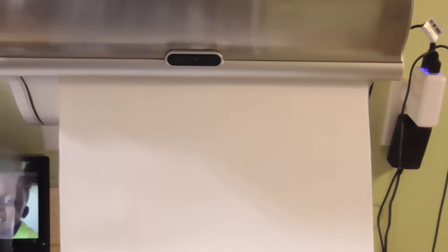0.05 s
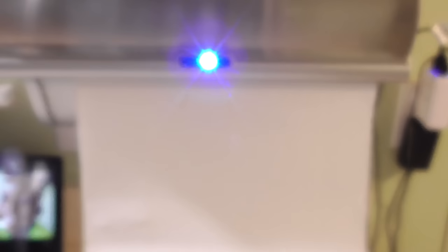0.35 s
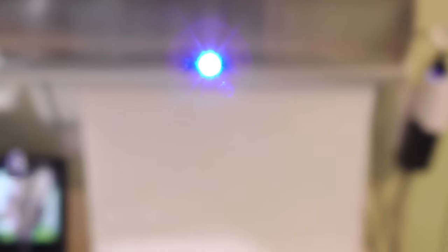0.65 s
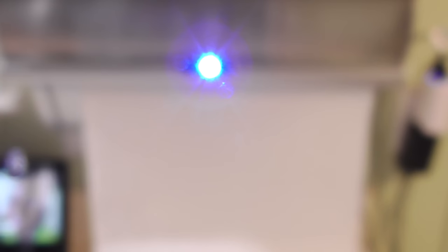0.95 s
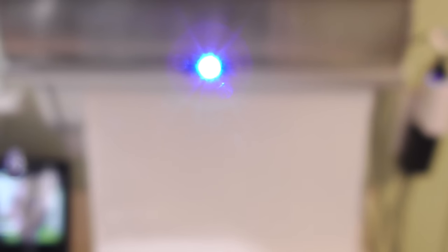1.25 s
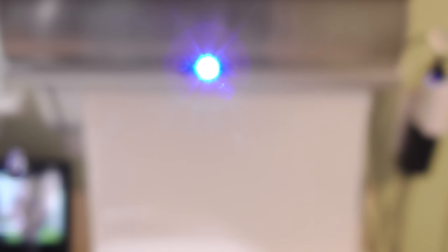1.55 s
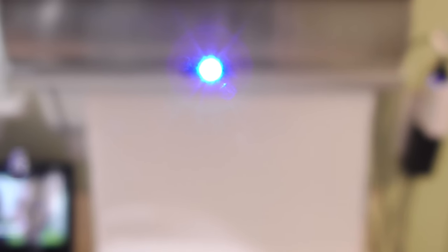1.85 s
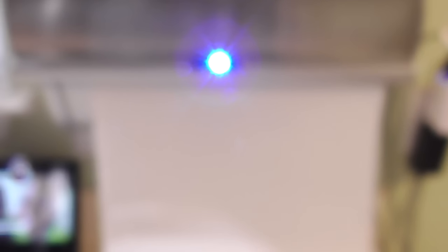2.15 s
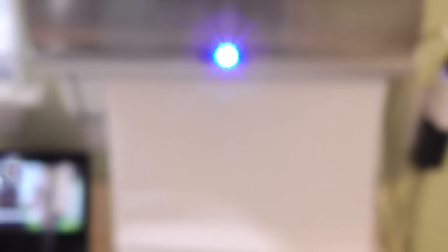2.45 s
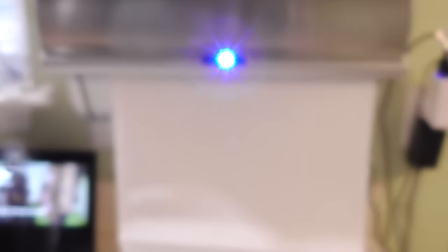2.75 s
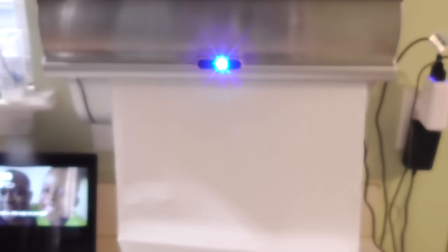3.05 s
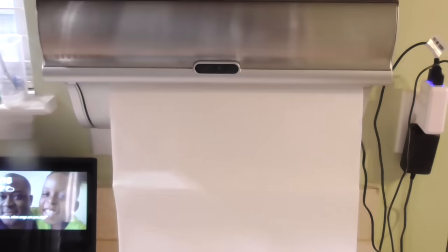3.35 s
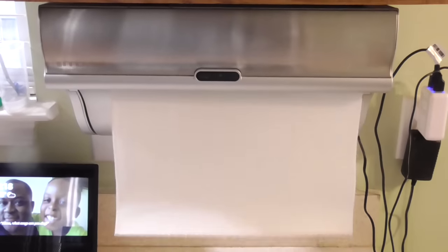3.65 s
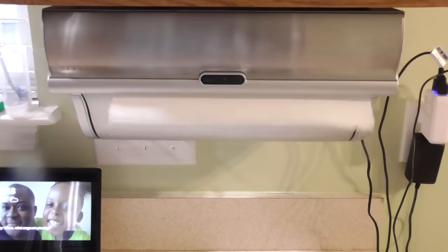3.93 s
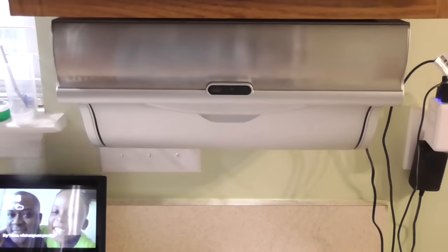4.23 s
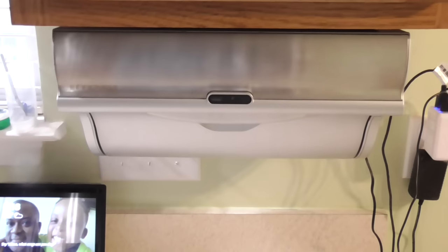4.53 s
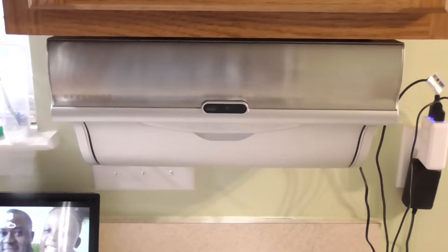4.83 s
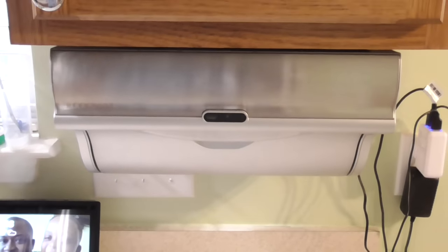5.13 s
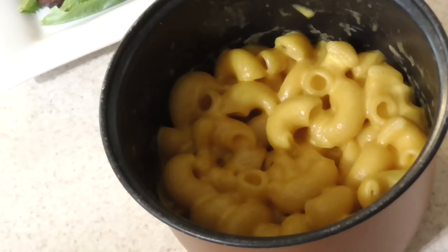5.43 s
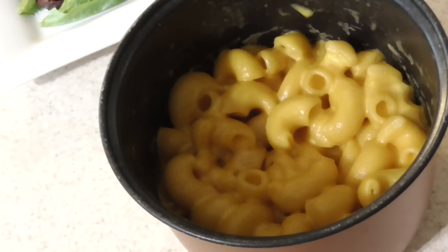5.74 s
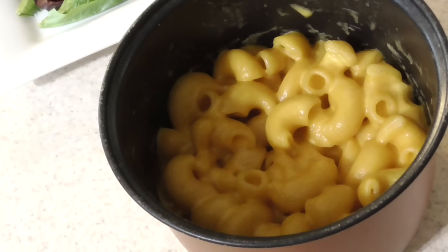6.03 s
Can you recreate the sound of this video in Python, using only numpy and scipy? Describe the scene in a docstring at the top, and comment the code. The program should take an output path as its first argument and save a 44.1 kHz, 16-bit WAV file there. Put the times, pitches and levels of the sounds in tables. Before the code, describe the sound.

A motorised paper towel dispenser whirs briefly twice, followed by rustling paper and sharp plastic clicks over a faint refrigerator hum.

```python
"""A motorised paper towel dispenser, close by in a kitchen where a refrigerator hums throughout.
One feed ends at 0.24 s; a few light clicks follow, and from 0.5 s a camera's focus drive ticks faintly.
At 3.3 s the motor spins up for a second feed: plastic gears rattle, the cover drones, paper hisses.
The sheet snags with a thud near 4 s; at 4.3 s the motor cuts out and coasts, and the cover shudders.
Then paper rustles, and plastic clicks go on until about 5.4 s, leaving the focus drive and the hum."""
import sys
import numpy as np
from scipy import signal
from scipy.fft import rfft, irfft
from scipy.io import wavfile
from scipy.ndimage import uniform_filter1d

SR = 44100
rng = np.random.default_rng(int(sys.argv[2]) if len(sys.argv) > 2 else 0)


def master(y):
    """Save y as 16-bit WAV."""
    cut = np.clip(np.atleast_2d(y).T, -1, 1)
    pcm = np.round(cut * 32767)  # scale
    wavfile.write(sys.argv[1], SR, pcm.astype(np.int16))


N = 268348
TIME, FREQS = np.arange(N) / SR, np.fft.rfftfreq(N, 1 / SR)


# motor cues: (switch on [s], switch off [s], coasting time constant [s])
MOTOR_RUNS = [(-0.7, 0.24, 0.041), (3.328, 4.274, 0.066)]
# EQ of the gear rattle in each feed: (frequency [Hz], relative gain [dB])
FIRST_RATTLE_EQ = [(50, -36), (250, -13), (400, -13), (440, -11), (490, -4.5), (630, -2), (720, 4),
                   (830, -5), (940, -4), (1090, -9.5), (1620, -13), (2600, -27), (4400, -36), (7000, -49)]
SECOND_RATTLE_EQ = [(50, -36), (460, -12), (560, 0), (780, -0.5), (870, -5), (1000, 2), (1180, -6),
                    (1400, -12), (1820, -17), (2020, -10), (2400, -22), (3200, -25.5), (4300, -34.5),
                    (7000, -43.5)]
# tones the motor draws from the housing in each feed: (frequency [Hz], relative level [dB])
FIRST_WHINE = [(254, -6.5), (318.8, -3.5), (391, -12), (732, -9), (932, -14)]
SECOND_WHINE = [(220.2, -8.5), (254.5, -17.5), (318, -14), (636, -15.5), (712, -14.5), (790, -16),
                (817, -18), (1005, -17), (1065, -19), (1118, -19)]

def dispenser():
    """Two feeds of paper; the second is raspier and rings the housing harder."""
    first = feed(MOTOR_RUNS[0], FIRST_RATTLE_EQ, FIRST_WHINE, cover_db=-32.3, paper_db=-51.5,
                 ring_depth=0.44, rattle_db=-30.5, whine_db=-31.2, rasp_db=-44)
    second = feed(MOTOR_RUNS[1], SECOND_RATTLE_EQ, SECOND_WHINE, cover_db=-32.9, paper_db=-50.6,
                  ring_depth=1.08, rattle_db=-31.5, whine_db=-31.5, rasp_db=-39.2)
    return pan(-.3) * first + pan(0.1) * second


def feed(run, rattle_eq, tones, cover_db, paper_db, **gear_mix):
    """One run of the motor: gears, cover and paper all swell and fade with its speed."""
    on_s, off_s, coast_s = run
    speed_db = motor_speed_db(on_s, off_s, coast_s)
    gears = gear_train(speed_db, rattle_eq, tones, **gear_mix)
    return gears + amp(cover_db) * cover_drone(speed_db, off_s) + amp(paper_db) * roller_hiss(speed_db)


def motor_speed_db(on_s, off_s, coast_s, jerk=0.08, spin_up_s=0.14, snag_s=4.04):
    """Speed against full speed: the motor jerks on, creeps up, sags at the snag, and coasts."""
    spin_up = (TIME > on_s) * (1 - (1 - jerk) * np.exp(-np.maximum(TIME - on_s, 0) / spin_up_s))
    coast = np.exp(-np.maximum(TIME - off_s, 0) / coast_s)
    snag_db = -3 * np.exp(-((TIME - snag_s) / 0.05) ** 2)
    return 20 * np.log10(spin_up * coast + 1e-9) + snag_db


# housing peaks and notches: (frequency [Hz], width [Hz], gain at ring_depth 1 [dB])
HOUSING_MODES = [(627, 17, -0.5), (705, 12, 3), (807, 22, 6.5), (1072, 23, 3), (1174, 14, 2.5),
                 (1250, 25, 6), (1400, 31, 7), (1533, 33, 8.5), (1580, 44, -1), (1665, 30, 10),
                 (1947, 41, 9), (1970, 19, 1), (2035, 50, 9), (2130, 32, 3), (2680, 58, 4), (3200, 120, 6),
                 (4060, 120, 7.5)]

def gear_train(speed_db, rattle_eq, tones, ring_depth, rattle_db, whine_db, rasp_db, shaft_hz=21.88):
    """Gears and motor ring the housing: a dull rattle, a whine, and a bright rasp when driven hard."""
    drive_db = 0.66 * speed_db
    # the shaft wobbles, and turns slower while it spins up and coasts down
    turns = np.cumsum(shaft_hz * (1 + .008 * np.maximum(drive_db, -20) + .012 * drift(12))) / SR
    teeth = near_pair(gear_teeth(turns), gear_teeth(turns))
    housing = 1 + sum((amp(ring_depth * db) - 1) * bell(hz, width) ** 2
                      for hz, width, db in HOUSING_MODES)
    rattle = colour(teeth, amp(read(rattle_eq)) * housing * near_sides())
    dull = low_band(rattle, 1780, order=10)
    whine = wavering(tones, flutter=0.37, stray=0.58, rate_hz=10)
    body = (unit(dull) * amp(rattle_db) + whine * amp(whine_db)) * amp(drive_db)
    # most of the rasp needs full speed; the rest follows the dull rattle
    rasp_envelope = 0.76 * amp(1.8 * speed_db) + 0.24 * amp(drive_db)
    return body + unit(rattle - dull) * amp(rasp_db) * rasp_envelope


def gear_teeth(turns, count=16, uneven=0.86, rough=1.32, scrape=1.85, throb=0.061):
    """Loose teeth knock either flank, partly in a pattern that repeats each turn, and scrape between."""
    tooth = np.floor(turns * count).astype(int)
    strikes = np.diff(tooth, prepend=tooth[0]) > 0
    wear = unit(rng.standard_normal(count))
    force = 0.23 + uneven * wear[tooth % count] + rough * rng.standard_normal(N)
    contact = unit(strikes * force) + scrape * rng.standard_normal(N)
    return contact * (1 + throb * np.cos(2 * np.pi * turns))


# low modes of the cover: (frequency [Hz], width [Hz], relative level [dB])
COVER_MODES = [(180.5, 49, -6.5), (221.5, 11, 1.5), (251.6, 19, -6.5), (317.5, 14.8, 0.5), (340, 41, -1.5),
               (381, 16, -13.5)]

def cover_drone(speed_db, off_s, shudder_delay_s=0.034, shudder_s=0.022):
    """The motor shakes the cover into a low drone, which shudders just after the cut-out."""
    shake = near_pair(*rng.standard_normal((2, N)))
    modes = sum(amp(db) * bell(hz, width) ** 2 for hz, width, db in COVER_MODES)
    drone = colour(shake, modes * bell(322, 660) ** 4)
    # the steady motor keeps the cover swinging evenly
    power = uniform_filter1d((drone ** 2).mean(0), size=2000)
    drone = unit(drone / np.sqrt(power + .05))
    shudder_db = 7.5 * np.exp(-((TIME - off_s - shudder_delay_s) / shudder_s) ** 2)
    return drone * amp(0.88 * speed_db + shudder_db)


# EQ of paper on the rollers: (frequency [Hz], relative gain [dB])
ROLLER_EQ = [(2650, -26), (4500, 3), (4760, -4.5), (5920, -6), (7430, -1.5), (11000, -4), (14200, -16.5),
             (15500, -50)]

def roller_hiss(speed_db):
    """Paper runs over the rollers with a grainy hiss that rides the motor's speed."""
    fibres = near_pair(grains(9000, 1.6), grains(9000, 2.5))
    return colour(fibres, amp(read(ROLLER_EQ)) * near_sides()) * amp(0.76 * speed_db)


# bumps of the roll and soft thuds: (time [s], level before the low cut [dB], pitch [Hz])
BUMP_HITS = [(.002, -19, 103), (.004, -15, 293), (.015, -15, 250), (3.385, -31, 215), (4.055, -10.5, 246),
             (4.058, -16, 350), (4.08, -17, 310), (4.422, -28.5, 300), (4.875, -35, 128), (4.966, -33, 160),
             (5.359, -38, 260)]

def roll_bumps(attack_s=0.0013, t60_cycles=18, low_cut_hz=120):
    """The roll jolts the cover: short low rings from a panel too small to radiate deep bass."""
    out, t = np.zeros((2, N)), np.arange(SR // 4) / SR
    for s, db, hz in BUMP_HITS:
        envelope = amp(db - 60 * t * hz / t60_cycles) * (1 - np.exp(-t / attack_s))
        add(out, s, envelope * np.sin(2 * np.pi * hz * t))
    return signal.sosfilt(signal.butter(3, low_cut_hz, "high", fs=SR, output="sos"), out)


# clicks: (time [s], knock level [dB], knock pitch [Hz], crack level [dB], crack ring [Hz], pan [dB])
CLICK_HITS = [(.343, -40, 1500, -49, 4000, -2), (0.582, -45, 1500, -57, 2370, -4),
              (0.752, -45, 1480, -53, 3950, -5), (4.566, -41, 1430, -30, 2190, -2),
              (4.703, -24, 1100, -43, 7000, -5), (4.757, -31, 890, -50, 5500, -4),
              (4.844, -26, 766, -44.5, 5960, -4), (4.876, -27, 800, -33, 8200, -4),
              (4.917, -28, 762, -44, 3500, -5), (4.9433, -7, 960, -28, 8200, -4.5),
              (4.949, -18, 935, -38, 8200, -12), (4.9665, -12, 800, -22, 8200, -0.5),
              (5.054, -29, 850, -42, 2600, -4), (5.192, -23, 1020, -41, 3960, -6),
              (5.3592, -17.5, 1050, -23.7, 8000, -5), (5.38, -44, 1080, -48, 8000, -4)]
# EQ of the crack: (frequency [Hz], relative gain [dB])
CRACK_EQ = [(300, -20), (900, 12), (1700, -5.5), (2400, 4), (4000, -1), (5500, -4), (8000, -3.5),
            (11000, -3.5), (15500, -13)]

def sharp_clicks(knock_t60_s=0.011, crack_t60_s=0.023, attack_s=0.0008, ring_width_hz=1200):
    """Each click layers a bright, resonant crack over a quickly damped knock; most are the dispenser's plastic,
    but the light clicks at 0.58 s and 0.75 s come from the lens."""
    out, t = np.zeros((2, N)), np.arange(SR // 10) / SR
    noise = pair(*rng.standard_normal((2, N)), likeness=[(500, 0.3), (4000, 0.34), (12000, 0.19)])
    noise = colour(noise, amp(read(CRACK_EQ)))
    for s, knock_db, hz, crack_db, ring_hz, pan_db in CLICK_HITS:
        phase = 2 * np.pi * hz * t
        body = np.sin(phase) + amp(-10) * np.sin(1.274 * phase) + amp(-12) * np.sin(0.6 * phase)
        knock = body * amp(knock_db - 60 * t / knock_t60_s) * (1 - np.exp(-t / attack_s))
        burst = noise[:, round(s * SR):][:, :len(t)]
        ring = amp(5) * signal.lfilter(*signal.iirpeak(ring_hz, ring_hz / ring_width_hz, SR), burst)
        fade = amp(crack_db - 60 * t / crack_t60_s)
        crack = unit((burst + ring) * fade) * np.sqrt(np.mean(fade ** 2))
        add(out, s, pan(pan_db) * (knock + crack))
    return out


# paper rustles; the last row is a short, faint hiss swelling into the click at 5.19 s and fading after:
# (peak time [s], attack [s], release [s], level [dB], low shelf [dB])
SWELLS = [(3.407, .015, .04, -48, -4), (3.855, .02, .03, -50, -4), (4.025, .015, .02, -41, -6),
          (4.16, .022, 0.026, -35, -6), (4.375, .012, .02, -55, 3), (4.493, 0.011, 0.1, -40, -7),
          (4.595, 0.04, 0.06, -48.5, 0), (4.71, 0.02, 0.05, -53, 6), (4.8, .04, 0.05, -51.5, 5),
          (4.935, 0.043, 0.027, -38.5, -1), (4.985, .02, 0.08, -53, 3), (5.102, 0.015, .05, -50.5, 0),
          (5.19, 0.015, 0.034, -48.5, 1)]
# their EQ: (frequency [Hz], relative gain [dB])
SWELL_EQ = [(300, -20), (600, -2), (1000, 9), (1800, -4), (2400, -3), (2900, -8), (4000, -1.5), (5900, -8),
            (7700, 0), (11000, -5), (15500, -13)]

def rustles_and_hiss(grains_per_s=4000, tail_db=-23, tail_s=0.13):
    """Grainy swells with soft tails: paper fibres catch, let go and settle; the last is a faint hiss."""
    snaps = pair(grains(grains_per_s, 2.6), grains(grains_per_s, 3.2), [(1500, 0.53), (10000, 0.25)])
    sides = pan_by_band([(1000, -4), (6000, -1), (13000, -10)])
    texture = colour(snaps, amp(read(SWELL_EQ)) * sides)
    lows = low_band(texture, 3200, order=3)  # in paper, the whole sheet rather than single fibres
    out = np.zeros((2, N))
    for s, attack, release, db, shelf_db in SWELLS:
        swell = np.interp(TIME - s, [-attack, 0, release], [0, 1, 0])
        tail = amp(tail_db) * (TIME > s) * np.exp(-abs(TIME - s) / tail_s)
        out += amp(db) * np.maximum(swell, tail) * (texture + (amp(shelf_db) - 1) * lows)
    return out


# kitchen reverb: (frequency [Hz], time to fall 60 dB [s])
REVERB_DECAY = [(150, 0.3), (1000, 0.27), (4000, 0.19), (14000, 0.032)]

def kitchen_reverb(x, reflections_per_s=3000):
    """Sparse reflections of random sign, each band dying at its own speed."""
    taps = rng.standard_normal((2, SR // 2)) * (rng.random((2, SR // 2)) < reflections_per_s / SR)
    taps[:, :SR // 250] = 0  # 4 ms pre-delay
    hz, t, bands = signal.stft(taps + .5 * taps[::-1], SR, nperseg=256)
    decay = amp(-60 * t / read(REVERB_DECAY, hz)[:, None])
    tail = signal.istft(bands * decay, SR, nperseg=256)[1]
    return signal.fftconvolve(x, tail / np.linalg.norm(tail[0]), axes=1)[:, :N]


# focus drive cues: (start [s], end [s], low ring level [dB], high ring level [dB])
FOCUS_CUES = [(.5626, .69, -65.5, -76), (.8294, 2.19, -66.3, -81), (2.1972, 2.9, -66.5, -73),
              (2.9145, 3.4, -69, -80), (5.229, 5.48, -69.5, -75), (5.4959, 6.05, -66.3, -69)]
# resonances the drive rings: (frequency [Hz], width [Hz], relative level [dB])
FOCUS_LOW_MODES = [(1440, 200, 2), (1530, 90, 2.5), (2250, 550, -2.5), (2626, 280, -5.5)]
FOCUS_HIGH_MODES = [(3780, 800, -1), (4670, 700, -10.5), (8740, 700, -5.5), (9800, 760, -9),
                    (11500, 1100, -12.5), (13900, 800, -14)]

def focus_drive(steps_per_s=59.95, pull=-.65, uneven=0.18):
    """The lens steps, pushing and pulling in turn, and each tick rings a few resonances."""
    ticks = np.zeros((2, N))  # one row for the low modes, one for the high
    for start, end, low_db, high_db in FOCUS_CUES:
        steps = np.flatnonzero(np.diff(np.floor((TIME - start) * steps_per_s)))
        steps = steps[(TIME[steps + 1] >= start) & (TIME[steps] < end)]
        ticks[:, steps] = amp([[low_db], [high_db]]) * np.resize([1, pull], len(steps))
    ticks *= np.sqrt(SR / steps_per_s) * (1 + uneven * rng.standard_normal(N))
    rings = [unit(sum(amp(db) * bell(hz, width) ** 4 for hz, width, db in modes))
             for modes in (FOCUS_LOW_MODES, FOCUS_HIGH_MODES)]
    return irfft((rfft(ticks) * rings).sum(0), N)


def lens_glide(start_s=0.5, end_s=0.76, level_db=-66):
    """The lens glides out of focus with a thin hiss."""
    gate = (TIME > start_s) & (TIME < end_s)
    return amp(level_db) * gate * colour(rng.standard_normal((2, N)), bell(11500, 6000) ** 2)


# EQ of the kitchen air: (frequency [Hz], relative gain [dB])
AIR_EQ = [(20, -38), (50, -15), (75, -13.5), (115, -7), (165, -8), (260, -3), (380, -9), (520, -10.3),
          (950, -15), (1400, -25), (1800, -31), (3200, -36), (6200, -41), (15800, -39)]
# its stereo image: (frequency [Hz], left-right likeness [0-1])
AIR_LIKENESS = [(60, 0.73), (180, 0.61), (550, 0.27), (1650, 0.54), (4970, 0.42), (15000, 0.042)]
# refrigerator tones: (frequency [Hz], level before trim [dB])
FRIDGE_TONES = [(98.6, -62.5), (117.6, -58.5), (134.7, -61.5), (200.3, -64.5), (235.3, -54.5), (269.2, -64),
                (525.6, -72.5), (936, -73)]

def room_tone(air_db=-53.2, hiss_db=-68, fridge_trim_db=-2):
    """The bed: still air, microphone hiss and the wavering hum of the refrigerator."""
    air = colour(pair(*rng.standard_normal((2, N)), AIR_LIKENESS), amp(read(AIR_EQ)))
    hiss = colour(rng.standard_normal((2, N)), bell(7730, 930) ** 2 + 0.99 * bell(10800, 8800) ** 2)
    hum = wavering(FRIDGE_TONES, flutter=0.18, stray=.35, rate_hz=3)
    return pan(0.27) * (amp(air_db) * air + amp(fridge_trim_db) * hum) + amp(hiss_db) * hiss


# stereo image of the dispenser: (frequency [Hz], left-right likeness [0-1])
DISPENSER_LIKENESS = [(60, 0.78), (180, 0.97), (550, 0.88), (1650, 0.89), (4970, 0.73), (15000, 0.33)]

def near_pair(a, b):
    """Gives two unrelated sounds the dispenser's stereo width."""
    return pair(a, b, DISPENSER_LIKENESS)


# placement of the dispenser: (frequency [Hz], left over right [dB])
DISPENSER_PAN = [(60, 0.5), (180, 10), (550, -2), (1650, -1.5), (4970, 0), (15000, -6)]

def near_sides():
    """The dispenser's left and right gains at each frequency."""
    return pan_by_band(DISPENSER_PAN)


def pair(a, b, likeness):
    """Mid-side stereo from two unrelated sounds, alike by band: (frequency [Hz], likeness [0-1])."""
    same = np.clip(read(likeness), 0, 1)
    mid, side = rfft(a) * np.sqrt(1 + same), rfft(b) * np.sqrt(1 - same)
    return irfft(np.array([mid + side, mid - side]), N)


def pan(left_over_right_db):
    return amp([[left_over_right_db / 2], [-left_over_right_db / 2]])


def pan_by_band(points):
    """Channel gains from (frequency [Hz], left over right [dB])."""
    return amp(np.array([[.5], [-.5]]) * read(points))


def wavering(tones, flutter, stray, rate_hz):
    """Tones (frequency [Hz], rms level [dB]) that flutter in level and stray in phase."""
    out = np.zeros(N)
    for hz, db in tones:
        level = amp(db) * (1 + flutter * drift(rate_hz))
        out += level * np.sin(2 * np.pi * hz * TIME + stray * drift(rate_hz))
    return np.sqrt(2) * out


def grains(per_s, spread_db):
    """Random tiny snaps of very uneven size; rms 1."""
    size = amp(spread_db * np.minimum(rng.exponential(1, N), 4)) * rng.standard_normal(N)
    return unit(size * (rng.random(N) < per_s / SR))


def drift(hz):
    """Slow random modulation up to about hz; rms 1."""
    knots = rng.standard_normal(400)
    return unit(np.interp(TIME * hz * 2, np.arange(len(knots)), knots))


def bell(hz, width_hz):
    """Magnitude of one resonance."""
    return 1 / np.sqrt(1 + (2 * (FREQS - hz) / width_hz) ** 2)


def read(points, hz=FREQS):
    """Joins (frequency [Hz], value) points on a log-frequency axis."""
    point_hz, value = np.transpose(points)
    return np.interp(np.log(hz + 1), np.log(point_hz + 1), value)


def colour(x, gain):
    """Filters by a gain for each frequency; rms 1."""
    return unit(irfft(rfft(x) * gain, N))


def low_band(x, hz, order):
    """Zero-phase low-pass: subtracting it from x leaves a clean high band."""
    return signal.sosfiltfilt(signal.butter(order, hz, fs=SR, output="sos"), x)


def amp(db):
    return 10 ** (np.asarray(db) / 20)


def unit(x):
    """Scales to rms 1."""
    return x / np.sqrt(np.mean(x ** 2) + 1e-20)


def add(mix, start_s, sound):
    part = mix[:, max(round(start_s * SR), 0):][:, :sound.shape[-1]]
    part += sound[..., :part.shape[1]]


def scene():
    """Dispenser and paper up front; only the dull part of each hit comes back from the kitchen."""
    feeds = dispenser()
    hits = roll_bumps() + sharp_clicks()
    send = signal.sosfilt(signal.butter(2, 1500, fs=SR, output="sos"), hits)
    reverb = amp(-17) * kitchen_reverb(send)
    return feeds + hits + reverb + rustles_and_hiss() + room_tone() + focus_drive() + lens_glide()


def record(dry):
    """A steep high cut at 15.85 kHz on the whole mix."""
    high_cut = signal.firwin(401, 15850, window=("kaiser", 9), fs=SR)
    return signal.oaconvolve(dry, high_cut[None], "same", axes=1)


dry = scene()
out = record(dry)
master(out)
```